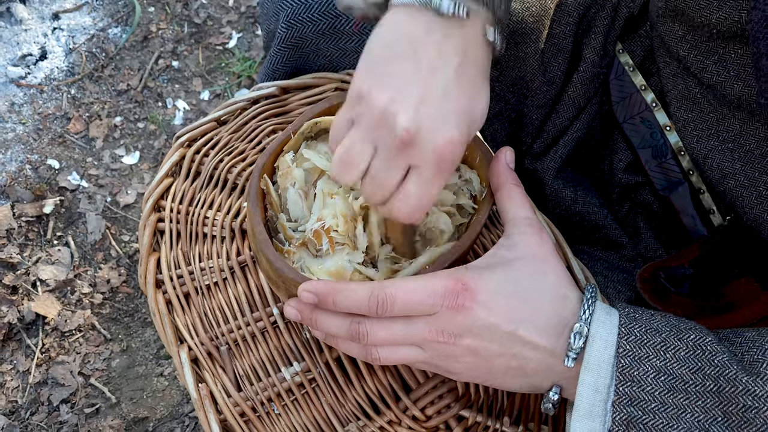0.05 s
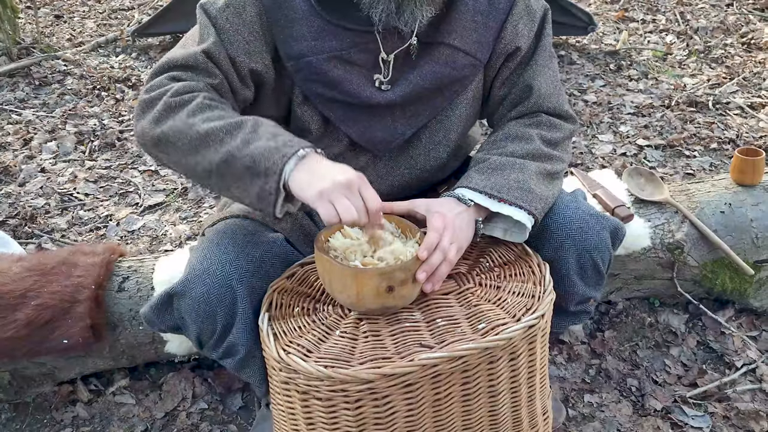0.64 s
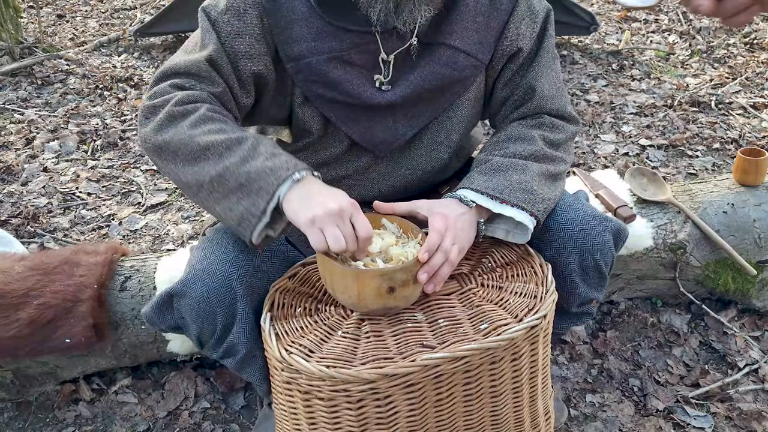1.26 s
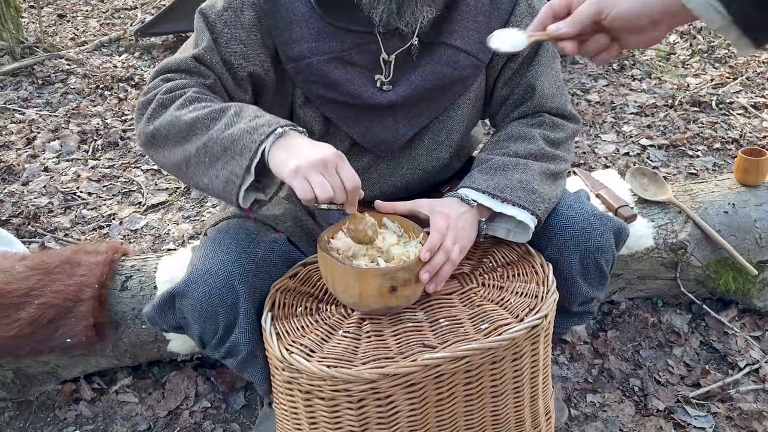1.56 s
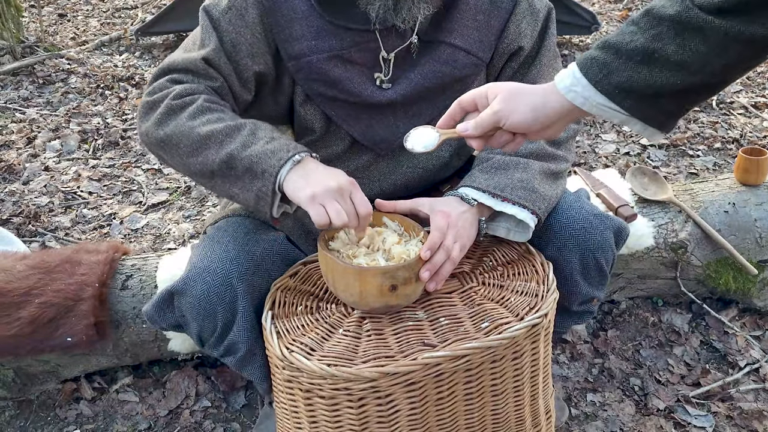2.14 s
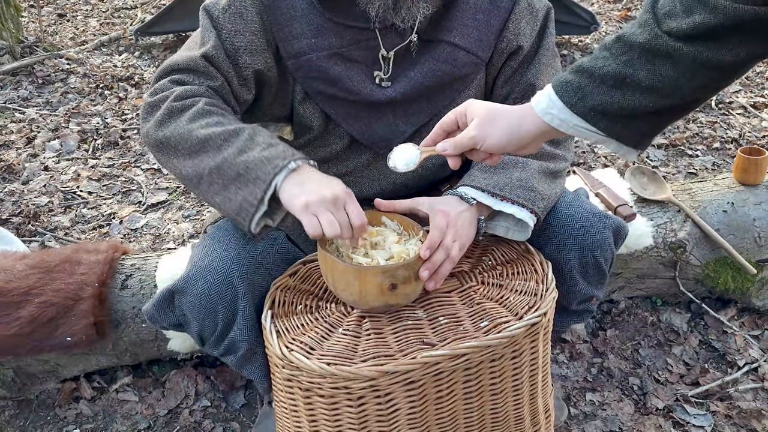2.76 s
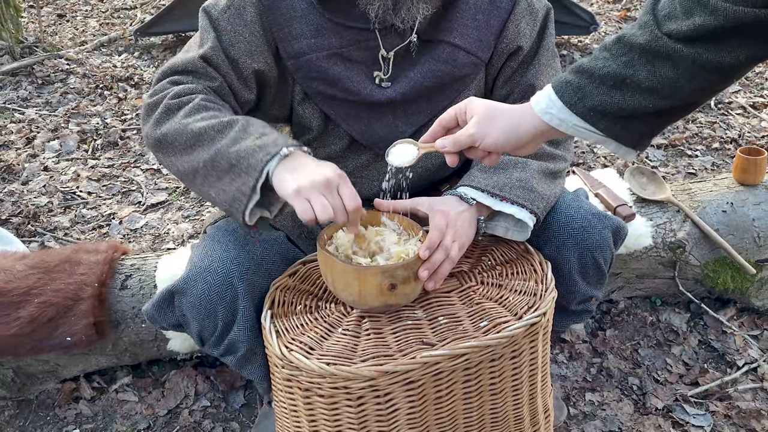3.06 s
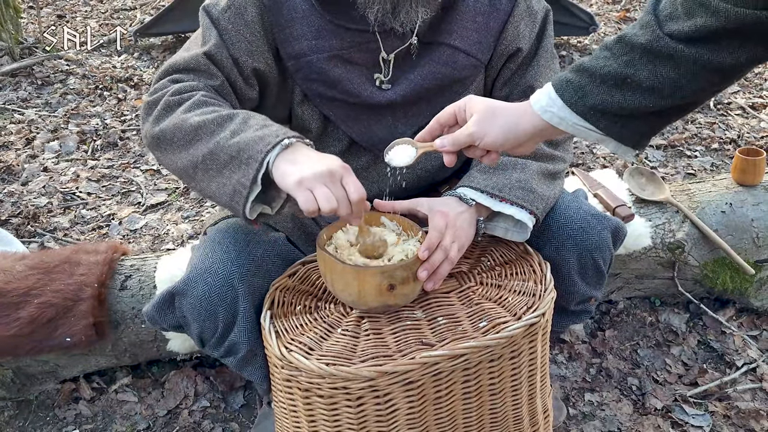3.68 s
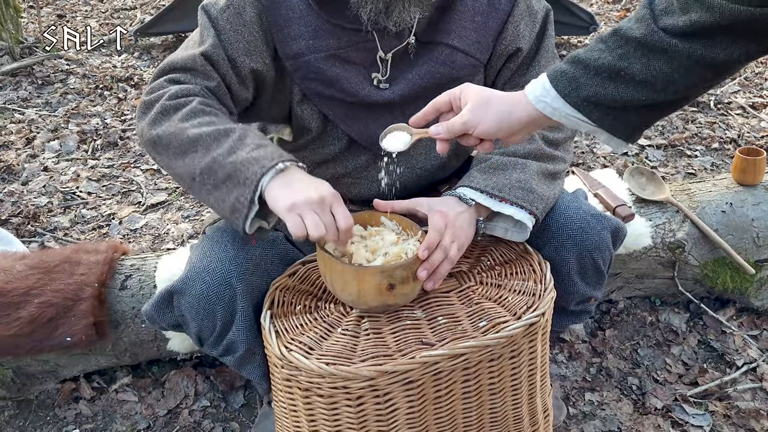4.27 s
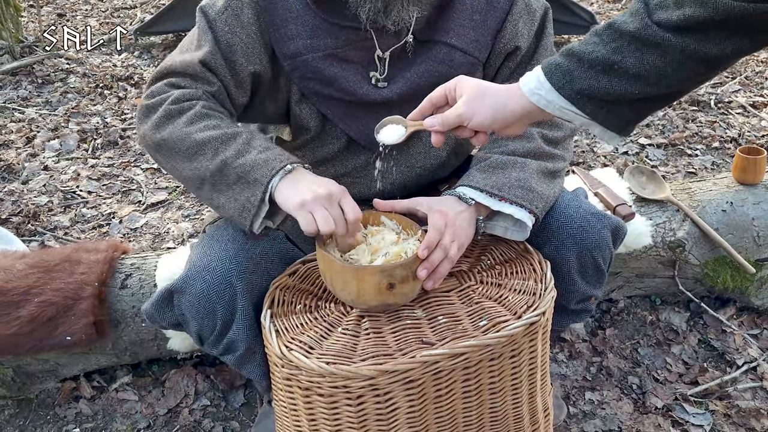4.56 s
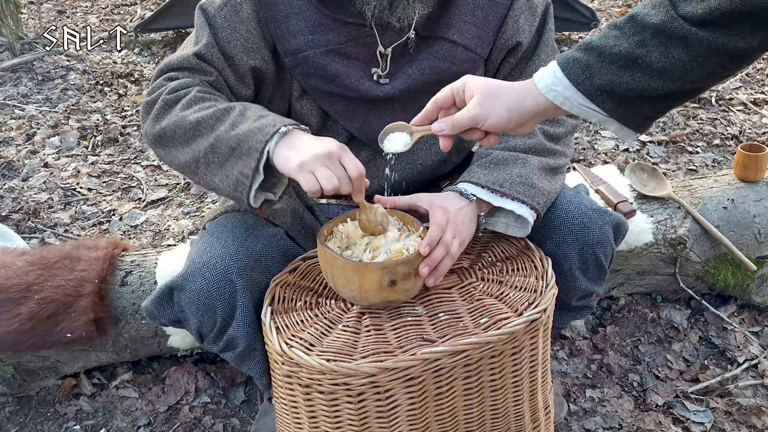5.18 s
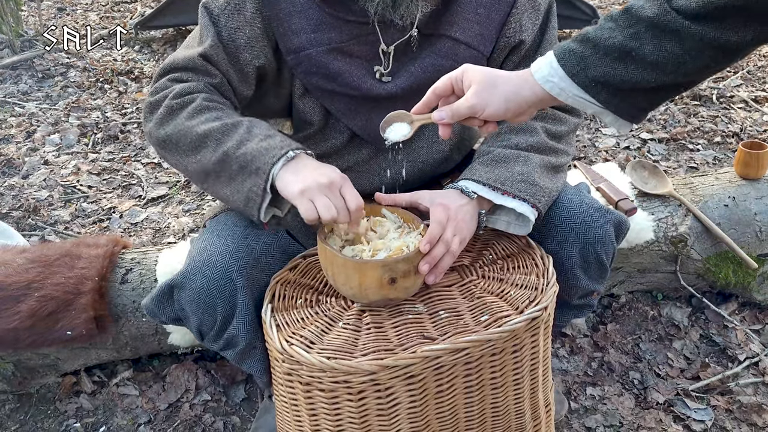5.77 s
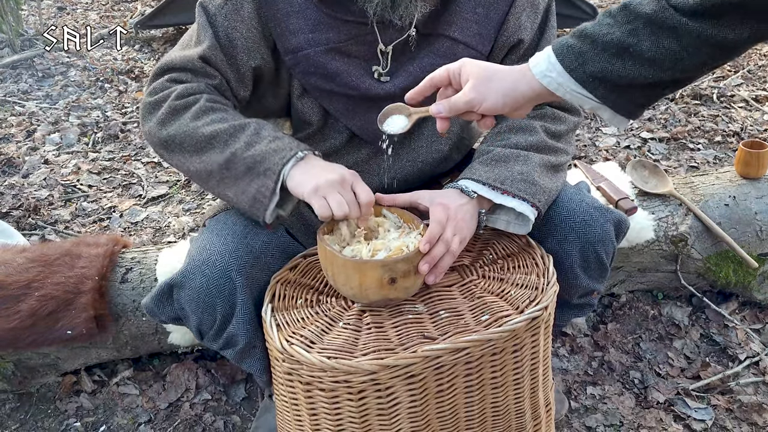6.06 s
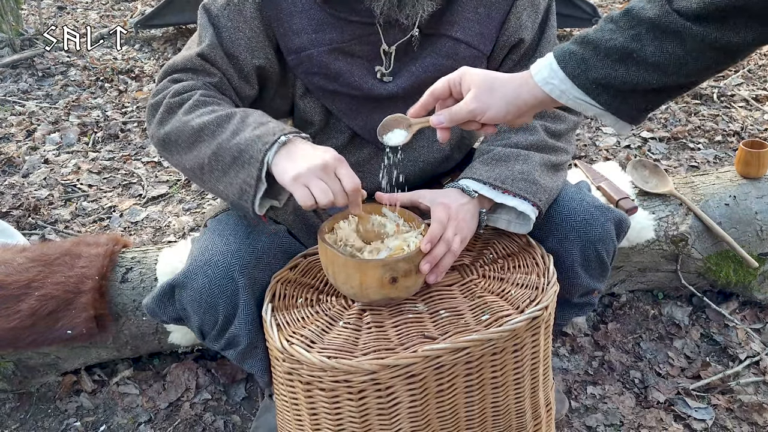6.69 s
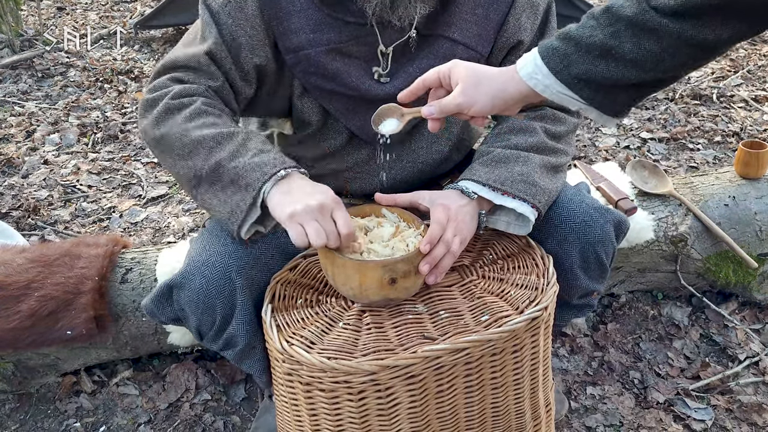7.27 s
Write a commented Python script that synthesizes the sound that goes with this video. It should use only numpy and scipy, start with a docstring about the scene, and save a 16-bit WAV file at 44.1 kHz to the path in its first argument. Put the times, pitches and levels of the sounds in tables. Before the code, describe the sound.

Forest songbirds whistle and twitter around the close cracks, knocks and dry rustle of dried fish being crushed in a wooden bowl.

```python
"""Dried fish is crushed and stirred in a wooden bowl, in a forest full of songbirds.
From the start, flakes snap, knock on the bowl and rustle; near birds whistle, slur and buzz over a
far chorus, and one flutes a phrase. Near 1.5 s the dragging spoon makes the wood groan, then a tiny
bird flicks and twitters. From 2.6 s salt trickles in. After 4 s the snaps are softer, and at 6.7 s
a harsh trill begins."""
import sys
import numpy as np
from scipy import signal
from scipy.fft import rfft, irfft, next_fast_len
from scipy.io import wavfile
from scipy.ndimage import uniform_filter1d, map_coordinates

SR = 44100
rng = np.random.default_rng(int(sys.argv[2]) if len(sys.argv) > 2 else 0)


def output_pcm(signal):
    """Save a mono or channel-first signal as 16-bit PCM at the path in sys.argv[1].

    Samples are clipped to [-1, 1] before scaling.
    """
    pcm = np.clip(np.atleast_2d(signal).T, -1, 1) * 32767
    wavfile.write(sys.argv[1], SR, np.round(pcm).astype(np.int16))


N = 323253
TIME = np.arange(N) / SR


def from_db(db):
    """Decibels to gain."""
    return 10 ** (np.asarray(db) / 20)


def rms_one(x):
    """Scale to unit power."""
    return x / np.sqrt(np.mean(x ** 2) + 1e-20)


def in_time(rows):
    """Interpolate a curve table's columns at every sample."""
    s, *columns = np.transpose(rows)
    return [np.interp(TIME, s, c) for c in columns]


def add(out, start_s, sound):
    """Mix a sound in at start_s."""
    at = max(int(start_s * SR), 0)
    part = out[..., at:at + sound.shape[-1]]
    part += sound[..., :part.shape[-1]]


def panned(x, left_db):
    """Constant-power pan."""
    return rms_one(from_db([[left_db / 2], [-left_db / 2]])) * x


def widen(pair, side_db):
    """Two unrelated signals as mid and side of a centred stereo sound."""
    return pair[0] + from_db(side_db) * pair[1] * np.array([[1], [-1]])


def wander(per_s, size):
    """Smooth random curve, spread about one."""
    place = np.arange(size) * per_s / SR
    return map_coordinates(rng.standard_normal(int(place[-1]) + 3), [place], order=2, mode="mirror")


def coloured(x, spectrum):
    """Filter by (Hz, dB) points; unit power."""
    size = next_fast_len(N)
    hz, level_db = np.transpose(spectrum)
    gain = from_db(np.interp(np.log(np.fft.rfftfreq(size, 1 / SR) + 1), np.log(hz), level_db))
    return rms_one(irfft(rfft(x, size) * gain, size)[..., :N])


def resonate(x, modes):
    """Parallel resonances of alternating sign, band-limited; unit power."""
    out = 0
    for k, (hz, width_hz, level_db) in enumerate(modes):
        r = np.exp(-np.pi * width_hz / SR)
        poles = [1, -2 * r * np.cos(2 * np.pi * hz / SR), r * r]
        out = out + (-1) ** k * from_db(level_db) * signal.lfilter([1 - r, 0, r - 1], poles, x)
    edges_hz = [modes[0][0] * .65, min(modes[-1][0] * 1.4, 19000)]
    return rms_one(signal.sosfilt(signal.butter(2, edges_hz, "band", fs=SR, output="sos"), out))


def scatter(x, t60_s, side_db):
    """Dense, decaying echoes from trunks and ground."""
    t = np.arange(int(SR * .8)) / SR
    echoes = rng.standard_normal((2, len(t))) * from_db(-60 * t / t60_s) * (1 - np.exp(-t / .0016))
    echoes = rms_one(widen(echoes, side_db)) / np.sqrt(len(t))
    return signal.fftconvolve(np.atleast_2d(x), echoes, axes=1)[:, :N]


def grains(per_s, size_db):
    """Two streams of random impulses of unequal size."""
    sizes = from_db(size_db * np.minimum(rng.exponential(1, (2, N)), 4.5))
    return (rng.random((2, N)) < per_s / SR) * sizes * rng.choice([-1, 1], (2, N)) + 1e-18


def glide(hz, change_hz):
    """First, middle and last pitch of an even glide through hz."""
    return [hz - change_hz / 2, hz, hz + change_hz / 2]


def gliding_tone(length_s, pitches_hz, spread_hz, half_hoarse_hz=125, waver_hz=10, flutter_db=1.3):
    """A sine through three pitches; random modulation smears it into a buzz."""
    size = max(int(length_s * SR), 64)
    u = np.linspace(0, 1, size)
    hz = np.polyval(np.polyfit([0, .5, 1], pitches_hz, 2), u) + waver_hz * wander(120, size)
    hoarse = spread_hz ** 2 / (spread_hz ** 2 + half_hoarse_hz ** 2)
    smear = rms_one(wander(3.4 * spread_hz, size) + 1j * wander(5.6 * spread_hz, size))
    carrier = np.exp(2j * np.pi * np.cumsum(hz) / SR)
    tone = np.real((np.sqrt(1 - hoarse) + np.sqrt(hoarse) * smear) * carrier)
    swell = np.sin(np.pi / 2 * np.clip(np.minimum(u, 1 - u) / .14, 0, 1)) ** 2
    return rms_one(tone * swell * from_db(flutter_db * wander(90, size)))


def played(notes):
    """Mix gliding tones into one track."""
    track = np.zeros(N)
    for start_s, length_s, pitches_hz, spread_hz, level_db in notes:
        add(track, start_s, from_db(level_db) * gliding_tone(length_s, pitches_hz, spread_hz))
    return track


# Still air. Each row: frequency in Hz, relative density in dB.
AIR_SPECTRUM = [(20, -24), (55, 4.5), (100, -4.5), (200, -10), (400, -8), (1000, -14.5), (4000, -11),
                (16000, -44)]


def forest_air(level_db=-76):
    """A faint rumble swells and sinks over a steady hush."""
    hush = coloured(widen(rng.standard_normal((2, N)), side_db=-7), AIR_SPECTRUM)
    rumble = signal.sosfilt(signal.butter(2, [40, 160], "band", fs=SR, output="sos"), hush)
    swell = from_db(6 * wander(14, N))
    return from_db(level_db) * (hush + .5 * swell * rumble)


def thin_hiss(start_s=.51, level_db=-53, fade_db_per_s=30):
    """A thin, very high hiss starts near 0.5 s and fades."""
    hiss = coloured(rng.standard_normal((2, N)), [(11500, -51), (12300, 20), (16000, 9.5)])
    envelope_db = level_db - fade_db_per_s * abs(TIME - start_s) + 2 * wander(14.4, N)
    return hiss * from_db(envelope_db) * (TIME > start_s)


# Low, middle and high far voices. Each row: lowest pitch in Hz, highest pitch in Hz.
REGISTERS_HZ = [(1550, 2900), (2700, 4200), (4300, 6300)]
# Their loudness curves. Each row: time in seconds, relative level in dB.
LOW_LEVELS = [(0, -63.5), (.3, -50.5), (.8, -64.5), (1.051, -75), (1.5, -60), (1.851, -73), (2.2, -61),
              (2.8, -59), (3.499, -66), (3.799, -59.5), (4.1, -68), (4.55, -67.5), (4.801, -59),
              (5.298, -64), (5.55, -68.5), (5.85, -61.5), (6.3, -68.5), (6.8, -52.5), (7.301, -62)]
MIDDLE_LEVELS = [(0, -61), (.55, -79), (.8, -49.5), (1.3, -63), (1.75, -48), (2.1, -58.5), (3.05, -59),
                 (3.55, -62.5), (3.801, -68), (4.05, -57.5), (4.299, -74.5), (4.801, -74.5), (5.249, -63.5),
                 (5.751, -90.5), (6.1, -68), (6.45, -75.5), (7.3, -61.5)]
HIGH_LEVELS = [(0, -81), (0.551, -74), (.8, -66.5), (1.05, -82), (1.55, -69), (1.802, -57.5),
               (2.299, -73.5), (2.8, -66.5), (3.55, -68), (3.85, -91.5), (5.55, -75.5), (6, -67.5),
               (6.5, -74.5), (6.799, -64), (7.049, -71), (7.3, -64)]


def far_birds(count=460, slope=.24, bend=.18, uneven_db=10, gain_db=.5):
    """Short, hoarse chirps slide, arch or dip in three registers, blurred by echoes."""
    song = np.zeros(N)
    for (low_hz, high_hz), curve in zip(REGISTERS_HZ, [LOW_LEVELS, MIDDLE_LEVELS, HIGH_LEVELS]):
        level_db, = in_time(curve)
        register = np.zeros(N)
        for k, (when, pitch, length, slur, arch, strength) in enumerate(rng.random((count, 6))):
            u = np.linspace(-1, 1, int((.025 + .07 * length) * SR))
            contour = 1 - slope * (slur - .35) * u + bend * (arch - .4) * u * u
            hz = low_hz * (high_hz / low_hz) ** pitch * contour
            chirp = (1 - u * u) * np.sin(2 * np.pi * np.cumsum(hz) / SR)
            add(register, (k + when - 1) / count * N / SR, from_db(uneven_db * strength) * chirp)
        hoarseness = 1 + low_hz / 4000 * wander(.25 * low_hz, N)
        song += from_db(level_db) * rms_one(register * hoarseness)
    return from_db(gain_db) * (.4 * song + .9 * scatter(song, t60_s=.3, side_db=-22))


def trill(start_s=6.72, end_s=7.9, per_s=30, gain_db=-58):
    """One bird rattles off quick, harsh downstrokes."""
    song = np.zeros(N)
    for s in np.arange(start_s, end_s, 1 / per_s):
        onset_s = s + rng.normal(0, .0043)
        add(song, onset_s, gliding_tone(length_s=.04, pitches_hz=(4900, 4500, 3750), spread_hz=150))
    return from_db(gain_db) * (.6 * song + .8 * scatter(song, t60_s=.25, side_db=-30))


# Downward slurs. Each row: start and length in seconds, first pitch in Hz, last/first pitch ratio,
# relative level in dB.
SLUR_NOTES = [(0.157, 0.048, 2920, 0.81, -48), (0.222, 0.042, 3840, 0.73, -52),
              (1.285, 0.042, 1950, 0.76, -41.5), (1.268, 0.097, 3650, 0.81, -50),
              (1.309, 0.097, 1697, .85, -48.5), (2.439, 0.064, 3190, 0.86, -56.5),
              (3.323, 0.082, 2690, 0.81, -59), (4.026, 0.046, 3670, .85, -48),
              (4.753, 0.115, 3554, .86, -50.5), (5.357, 0.048, 3950, 0.76, -46),
              (5.891, 0.14, 1838, .79, -60.5), (6.163, 0.04, 4420, 0.79, -51.5),
              (6.632, 0.047, 3440, 0.89, -58.5), (6.819, 0.039, 2382, 0.83, -39.5),
              (6.954, 0.046, 2324, 0.84, -40.5)]
# Even glides. Each row: start and length in seconds, middle pitch and glide in Hz, relative level in dB.
WHISTLE_NOTES = [(0.464, 0.065, 1978, -45, -49.5), (0.641, 0.051, 1896, 98, -54.5),
                 (0.834, 0.075, 2120, 120, -42.5), (0.981, 0.1, 2634, 51, -50.5),
                 (1.009, 0.046, 3280, 171.5, -46.5), (1.08, 0.049, 3350, 1112, -44),
                 (1.181, 0.06, 1840, 452.5, -55.5), (2.126, 0.066, 3064, 47, -53),
                 (2.272, 0.15, 3500, -350, -53), (2.516, 0.08, 4350, -100, -61.5),
                 (2.625, .07, 4180, -250, -55.5), (2.671, 0.082, 3255, -19.5, -50.5),
                 (2.699, 0.087, 2400, -130, -58.5), (3.173, 0.076, 4370, -80.5, -62.5),
                 (3.27, 0.14, 4480, -220, -59.5), (3.64, 0.15, 2750, -200, -63.5),
                 (4.272, 0.162, 1935, -4, -68), (0.411, 0.099, 1423, 60, -60.5),
                 (3.139, 0.091, 1744, -28, -59), (4.568, 0.075, 2876, -75.5, -54.5),
                 (5.226, 0.18, 1426, 202, -58.5), (5.371, 0.064, 1692, 131, -48.5),
                 (6.516, 0.27, 1688, -99.5, -47), (6.858, 0.053, 1880, -100, -42.5),
                 (7.162, 0.17, 2796, 225, -55.5)]
# Arches, dips and hooks. Each row: start and length in seconds, first, middle and last pitch in Hz,
# relative level in dB.
CURL_NOTES = [(0.759, 0.098, 1890, 1796, 1970, -49.5), (0.785, 0.02, 3280, 4330, 4300, -48),
              (0.826, 0.029, 3390, 4200, 4550, -50), (.88, .017, 3620, 4250, 4600, -50.5),
              (2.09, 0.078, 4150, 3450, 2975, -53.5), (2.627, 0.054, 4100, 3370, 2770, -54.5),
              (2.829, 0.048, 3800, 3570, 3500, -53.5), (2.86, 0.042, 4480, 4230, 4150, -57.5),
              (2.943, 0.096, 3330, 3604, 3600, -55), (3.064, .06, 3950, 4200, 4260, -57.5),
              (3.082, 0.059, 3670, 3160, 3080, -59), (3.391, .16, 3930, 3244, 3146, -54.5),
              (3.569, .016, 7500, 7010, 6930, -65), (3.609, .016, 7550, 7200, 7050, -62.5),
              (3.64, .016, 7800, 7200, 7100, -68), (3.677, 0.015, 7460, 7240, 7550, -62.5),
              (3.588, 0.15, 5800, 6350, 6430, -67), (4.535, 0.042, 5110, 3540, 3020, -54.5),
              (5.138, .04, 4080, 4120, 4270, -61), (5.163, 0.12, 3650, 2920, 3364, -51.5),
              (5.512, 0.15, 1672, 1736, 1394, -50.5)]


def clear_notes(slur_bow=.025, spread_hz=28, nearest_db=-48, blur_hz_per_db=4.2):
    """Slurs, whistles and curls; fainter singers are farther off and more blurred."""
    notes = [(s, length_s, [hz, hz * ((1 + ratio) / 2 - slur_bow), hz * ratio], db)
             for s, length_s, hz, ratio, db in SLUR_NOTES]
    notes += [(s, length_s, glide(hz, glide_hz), db) for s, length_s, hz, glide_hz, db in WHISTLE_NOTES]
    notes += [(s, length_s, pitches_hz, db) for s, length_s, *pitches_hz, db in CURL_NOTES]
    return played([(s, length_s, pitches_hz, spread_hz + blur_hz_per_db * max(nearest_db - db, 0), db)
                   for s, length_s, pitches_hz, db in notes])


# Hoarse calls, and two faint overtones above other notes (6850 Hz at 1.076 s, 9560 Hz at 1.786 s). Each row:
# start and length in seconds, pitch and spread in Hz, level in dB.
BUZZ_NOTES = [(0.888, 0.071, 3694, 131.3, -51), (1.076, 0.17, 6850, 155, -73.5),
              (1.22, 0.02, 4500, 326, -51), (1.355, 0.026, 4650, 336, -53.5),
              (1.435, 0.073, 2946, 301, -50.5), (1.617, 0.083, 2336, 297.7, -44.5),
              (1.717, 0.23, 2835, 199, -50), (1.786, 0.14, 9560, 59.6, -73),
              (2.125, 0.13, 1673, 169.5, -63), (2.415, 0.14, 1756, 129.3, -60),
              (2.879, 0.21, 2190, 98.9, -58), (3.985, 0.068, 3550, 174.4, -58),
              (4.074, 0.065, 2960, 149, -58), (4.448, 0.16, 1384, 89.8, -63.5),
              (4.948, .07, 2596, 169.5, -64), (5.09, 0.13, 2100, 77, -60), (5.778, 0.092, 1806, 208.4, -54),
              (5.944, 0.21, 4210, 87, -68), (6.469, 0.03, 2560, 125, -53), (6.47, 0.2, 1310, 81.7, -65),
              (6.566, 0.056, 2090, 166, -55.5), (6.717, 0.73, 4620, 109.6, -57),
              (7.051, 0.08, 4030, 212, -53.5), (7.288, 0.025, 5520, 368, -52)]


def buzzes(sag=.025):
    """An unsteady syrinx smears each slightly sinking note."""
    return played([(s, length_s, glide(hz, -sag * hz), spread_hz, db)
                   for s, length_s, hz, spread_hz, db in BUZZ_NOTES])


# One fluted phrase. Each row: time in seconds, pitch in Hz, level in dB.
FLUTED_CURVE = [(.16, 1820, -53.5), (.24, 2115, -48.5), (.3, 1880, -59), (.345, 1696, -46),
                (.39, 2107, -39.5), (.43, 2370, -33), (.455, 2520, -78), (.485, 2690, -40),
                (.53, 2710, -47), (.565, 2757, -43), (.6, 2733, -46), (.635, 2502, -38), (.7, 2468, -58)]


def fluted_phrase(ease_s=.012):
    """A pure tone winds up and down; the throat rounds every turn."""
    hz, level_db = in_time(FLUTED_CURVE)
    size = int(ease_s * SR)
    singing = (TIME > FLUTED_CURVE[0][0]) & (TIME < FLUTED_CURVE[-1][0])
    swell = uniform_filter1d(from_db(level_db) * singing, size)
    return swell * np.sqrt(2) * np.sin(2 * np.pi * np.cumsum(uniform_filter1d(hz, size)) / SR)


# Loud rolls. Each row: start and length in seconds, pitch and sweep in Hz, sweeps per second,
# relative level in dB.
ROLL_NOTES = [(0.726, 0.12, 2460, 260, 68, -42), (0.839, 0.058, 2174, 110, 70, -41.5),
              (1.223, 0.057, 2082, 160, 79, -42), (1.443, 0.038, 2128, 150, 64, -44),
              (1.526, 0.037, 2195, 150, 71, -43), (5.91, 0.087, 1980, 150, 57, -45.5),
              (6.126, 0.057, 2510, 100, 49.5, -43), (6.166, 0.19, 2284, 176, 49, -39),
              (7.256, 0.069, 2234, 60, 81, -36)]


def rolled_notes(ramp_s=.011, uneven=.55, rasp_hz=85):
    """Rasping notes: the pitch sweeps quickly and unevenly about a fixed centre."""
    track = np.zeros(N)
    for start_s, length_s, centre_hz, sweep_hz, per_s, level_db in ROLL_NOTES:
        t = np.arange(int(length_s * SR)) / SR
        turns = np.cumsum(per_s * (1 + uneven * wander(60, len(t)))) / SR
        hz = centre_hz + sweep_hz * np.sin(2 * np.pi * turns) + rasp_hz * wander(600, len(t))
        swell = np.clip(np.minimum(t, length_s - t) / ramp_s, 0, 1)
        add(track, start_s, from_db(level_db) * rms_one(swell * np.sin(2 * np.pi * np.cumsum(hz) / SR)))
    return track


def near_birds():
    """Singers straight ahead: nearby branches roughen the notes and the forest trails them."""
    clear, fluted, rolled, hoarse = clear_notes(), fluted_phrase(), rolled_notes(), buzzes()
    close_echo = from_db(-3.5) * scatter(clear + rolled, t60_s=.07, side_db=-38)
    send = from_db(-6) * clear + from_db(-8) * (fluted + rolled) + from_db(-2) * hoarse
    forest_echo = scatter(send, t60_s=.3, side_db=-40)
    return from_db(-1.35) * (clear + rolled + close_echo) + fluted + hoarse + forest_echo


def twitter(first_break_s=2.086, every_s=.0155, width_s=.0028, depth_db=-19, count=5):
    """The tiny bird's closing note sinks and is chopped by short breaks."""
    breaks = sum(np.exp(-((TIME - first_break_s - k * every_s) / width_s) ** 2) for k in range(count))
    note = gliding_tone(length_s=.2, pitches_hz=(7350, 6800, 6600), spread_hz=65)
    track = np.zeros(N)
    add(track, start_s=2.03, sound=from_db(-41) * note)
    return track * from_db(depth_db * breaks)


# Whip-like flicks. Each row: start and length in seconds, first and last pitch in Hz, level in dB.
FLICK_NOTES = [(1.78, 0.009, 7430, 3700, -42.5), (1.834, 0.009, 7500, 3680, -42),
               (1.892, 0.009, 7650, 3630, -46), (2.008, 0.016, 3690, 6500, -45.5),
               (2.023, 0.018, 3870, 7100, -43)]
# Thin notes between them. Each row: start and length in seconds, first pitch in Hz, level in dB.
HIGH_NOTES = [(1.723, 0.037, 7130, -54.5), (1.748, 0.032, 7000, -45.5), (1.793, 0.029, 6830, -42.5),
              (1.845, 0.031, 6780, -42.5), (1.905, 0.022, 6740, -44.5)]


def tiny_bird(repeat_s=.0075, sink_hz_per_s=4400, rasp_hz=170, thin_rasp_hz=65):
    """Thin, sinking notes alternate with double flicks and end in a twitter."""
    notes = [(s + delay_s, length_s, [first_hz, np.sqrt(first_hz * last_hz), last_hz], rasp_hz, db)
             for s, length_s, first_hz, last_hz, db in FLICK_NOTES for delay_s in (0, repeat_s)]
    for s, length_s, hz, db in HIGH_NOTES:
        pitches_hz = hz - sink_hz_per_s * length_s * np.array([0, .5, 1])
        notes.append((s, length_s, pitches_hz, thin_rasp_hz, db))
        notes.append((s, length_s, .76 * pitches_hz, rasp_hz, db - 14))   # other side of the syrinx
    song = played(notes) + twitter()
    return song + from_db(-8) * scatter(song, t60_s=.31, side_db=-31.5)


def basket(level_db=-83, t60_s=.032, per_mode_per_s=3, scuff_s=.05):
    """The wicker basket under the bowl gives with soft, low scuffs."""
    ringing = 0
    for hz in np.geomspace(50, 270, 8):
        r, w = from_db(-60 / (t60_s * SR)), 2 * np.pi * hz / SR
        kicks = (rng.random(N) < per_mode_per_s / SR) * rng.uniform(.61, 1.7, N) + 1e-18
        ringing = ringing + signal.lfilter([np.sin(w)], [1, -2 * r * np.cos(w), r * r], kicks)
    size = int(scuff_s * SR)
    scuffs = signal.fftconvolve(ringing, np.hanning(size) * rng.standard_normal(size))[:N]
    return from_db(level_db) * rms_one(signal.sosfilt(signal.butter(2, 450, fs=SR, output="sos"), scuffs))


# Bowl against basket. Each row: peak time in seconds, pitch in Hz, level in dB.
BOWL_BUMPS = [(0.102, 176, -49), (0.362, 206, -70), (.96, 54.6, -61.5), (0.999, 245, -75.5),
              (1.52, 130, -70.5), (2.091, 246, -71), (2.301, 61.4, -69.5), (2.32, 170.4, -68.5),
              (2.619, 55, -63.5), (2.8, 93, -62), (2.919, 67, -63), (3.029, 128, -69.5), (3.461, 60.5, -67),
              (3.851, 69.5, -69.5), (4.05, 250, -80), (5.78, 54.9, -63), (4.73, 282, -78), (4.91, 274, -67),
              (6.022, 232, -71), (6.67, 251, -70.5), (6.962, 60, -62)]


def bumps(rise_s=.025, fade_s=.048, edge_ratio=1.3):
    """The bowl bumps its basket: dull bands of noise swell and fade."""
    out, t = np.zeros((2, N)), np.arange(-.2, .2, 1 / SR)
    swell = np.exp(-(t / np.where(t < 0, rise_s, fade_s)) ** 2 / 2)
    for s, hz, level_db in BOWL_BUMPS:
        band = signal.butter(2, [hz / edge_ratio, hz * edge_ratio], "band", fs=SR, output="sos")
        rumble = rms_one(signal.sosfilt(band, widen(rng.standard_normal((2, len(t))), side_db=-15.5)))
        add(out, s + t[0], (from_db(level_db) * rumble * swell)[:, s + t >= 0])
    return out


# Salt on flakes. Each row: frequency in Hz, relative density in dB.
SALT_SPECTRUM = [(3000, -30), (6000, 4), (8500, -5), (11000, 0), (16000, 1.5)]


def salt(start_s=2.63, rise_s=.096, level_db=-77.5):
    """Grains trickle from a spoon and patter on the flakes as a fine hiss."""
    patter = coloured(widen(grains(per_s=2500, size_db=-3.5), side_db=-11.5), SALT_SPECTRUM)
    return patter * from_db(level_db + 3.8 * wander(8.9, N)) * np.clip((TIME - start_s) / rise_s, 0, 1)


# Spoon drags. Each row: start and length in seconds, first pitch, last pitch and spread in Hz,
# relative level in dB.
SPOON_GROANS = [(0.097, 0.015, 218, 200, 35, -67), (0.286, 0.12, 465, 425, 50, -70.5),
                (0.462, 0.042, 1000, 810, 90, -53), (0.877, 0.072, 610, 510, 80, -54),
                (1.291, 0.14, 670, 615, 50, -56), (1.41, 0.13, 560, 420, 90.7, -63.5),
                (1.511, 0.0695, 450, 383.5, 79.8, -43.5), (1.565, 0.116, 270, 231, 44.8, -44),
                (2.321, 0.11, 680, 600, 89.3, -65.5), (3.761, .04, 427, 380, 91, -58.5),
                (4.181, 0.11, 730, 670, 70, -65), (4.901, 0.078, 460, 400, 89, -66),
                (6.359, 0.078, 410, 350, 60, -64)]


def groans():
    """The spoon sticks and slips on the wood; the rough tone sinks as it slows."""
    return played([(s, length_s, [first_hz, np.sqrt(first_hz * last_hz), last_hz], spread_hz, db)
                   for s, length_s, first_hz, last_hz, spread_hz, db in SPOON_GROANS])


# Strokes through the flakes. Each row: start and hold in seconds, relative rub and rustle levels in dB.
STIR_STROKES = [(0.075, 0.0046, -39.5, -67.5), (0.288, 0.0089, -47.5, -71), (0.46, 0.061, -65, -71),
                (0.893, 0.017, -44, -74.5), (1.305, 0.27, -53, -97), (1.555, 0.14, -31.5, -67.5),
                (1.636, 0.04, -47, -57), (2.312, 0.0066, -46.5, -63.5), (2.474, 0.067, -58.5, -82.5),
                (2.813, 0.047, -59.5, -75), (3.096, 0.073, -76, -74), (3.478, 0.059, -75.5, -79.5),
                (3.771, 0.03, -44, -64), (3.915, 0.015, -59, -72.5), (4.196, 0.0054, -44, -64),
                (4.529, 0.057, -70, -77.5), (4.915, 0.012, -45, -63.5), (5.321, 0.04, -65, -69.5),
                (5.403, 0.036, -71, -66.5), (5.66, 0.076, -58, -77), (6.06, 0.07, -73, -76),
                (6.115, 0.085, -50.5, -68), (6.455, 0.0073, -64.5, -59.5), (6.557, 0.04, -82.5, -70.5),
                (6.77, 0.011, -88, -76), (6.888, 0.023, -69, -72), (7.251, 0.014, -55, -76)]


def stroke_levels(bite_db_per_s=476.5, ease_db_per_s=239.5):
    """Rub and rustle curves in dB: each stroke bites, holds and eases off."""
    rub_db, rustle_db = -77, -90.5   # flakes keep settling between strokes
    for s, hold_s, held_rub_db, held_rustle_db in STIR_STROKES:
        ramps_db = np.minimum(bite_db_per_s * (TIME - s), ease_db_per_s * (s + hold_s - TIME))
        shape_db = np.minimum(ramps_db, 0)
        rub_db = np.maximum(rub_db, held_rub_db + shape_db)
        rustle_db = np.maximum(rustle_db, held_rustle_db + shape_db)
    return rub_db, rustle_db


# Low bowl resonances. Each row: frequency and width in Hz, relative gain in dB.
THUD_MODES = [(156, 33, -8), (243, 49, -3), (410, 76, -3), (520, 76, 0.5), (612, 200, 5), (780, 360, 4.5),
              (1050, 40, -10)]
# Rustling flakes. Each row: frequency in Hz, relative density in dB.
RUSTLE_SPECTRUM = [(900, -1.5), (2000, 7), (4500, 4), (7000, 6), (8500, 4.5), (10000, 1.5), (13000, 4.5),
                   (16000, -8)]


def stirring():
    """Flakes drag over the wood, which hums, and crackle against each other in clumps."""
    rub_db, rustle_db = stroke_levels()
    drags = widen(grains(per_s=2600, size_db=2.6), side_db=-5)
    rubbing = from_db(rub_db - 12) * resonate(drags, THUD_MODES) + from_db(-1.5) * groans()
    crackle = grains(per_s=3600, size_db=4.5) * from_db(1.8 * wander(70, N))
    rustle = panned(coloured(crackle, RUSTLE_SPECTRUM), left_db=1.5)
    return rubbing + from_db(rustle_db + 15.5) * rustle


def crumbs():
    """Single crumbs break off with dry ticks, louder under each stroke."""
    _, rustle_db = stroke_levels()
    ticks = coloured(widen(grains(per_s=24, size_db=0), side_db=-7.5), RUSTLE_SPECTRUM)
    return from_db(rustle_db - 1) * panned(ticks, left_db=8)


# Resonances of the bowl (knock), stiff flakes (crack) and their fibres (splinter).
# Each row: frequency and width in Hz, relative gain in dB.
KNOCK_MODES = [(1650, 70, -8.5), (2160, 1500, -0.5), (2780, 250, 4)]
CRACK_MODES = [(4240, 670, 1.5), (5700, 480, 2.5), (7600, 1500, 2.5), (8350, 1700, -4)]
SPLINTER_MODES = [(9600, 750, -1), (13160, 5700, -1.5), (15400, 1200, 1.3)]
# Breaking flakes. Each row: time in seconds, thud, crack and splinter levels in dB over 10 ms,
# flake's left-over-right level in dB, right channel lag in ms.
FLAKE_SNAPS = [(.0865, -26, -40, -60, 4, .07), (.2738, -46, -28, -31, 5, .35),
               (.2792, -40, -26, -27, 7, .35), (.3593, -58, -36, -44, 8, .32),
               (.5518, -55, -36, -23, 8, .33), (1.6915, -31.5, -46, -49, 0, 0),
               (2.3072, -44, -26, -27, 7, .07), (2.3088, -40, -27, -21.5, 8, .09),
               (2.816, -68, -47, -64, 10, .25), (3.12, -75, -50, -53, 6, .28),
               (3.147, -78, -54, -59, 6, .28), (3.7625, -39, -25, -27, 4, .28),
               (3.917, -66, -51, -47, 8, .28), (4.1853, -48, -50, -42, 9, .28),
               (4.8945, -43, -46, -42, 8, .35), (4.935, -64, -53, -54, 6, .3), (5.056, -76, -63, -68, 3, 0),
               (5.332, -64, -54, -59, 2, 0), (5.3924, -66, -48, -49, 2, 0), (5.408, -76, -55, -53, 2, 0),
               (5.448, -76, -55, -55, 2, 0), (5.5002, -57, -76, -76, 2, 0), (5.293, -78, -62, -63, 2, 0),
               (5.635, -84, -66, -64, 2, 0), (5.816, -82, -56, -68, 7, 0), (5.829, -84, -63, -62, 3, 0),
               (6.111, -76, -60, -58, 3, 0), (6.128, -50, -49, -48, 5, .28), (6.192, -68, -56, -52, 2, 0),
               (6.4475, -72, -50, -49, 3, .03), (6.5576, -71, -52, -44, 2, 0), (6.582, -78, -60, -57, 2, 0),
               (6.603, -74, -55, -56, 2, 0), (6.7515, -84, -53, -47, 7, .1), (7.143, -80, -70, -64, 3, 0),
               (7.242, -72, -64, -61, 2, 0)]


def snaps(lead_in_s=.0019, break_s=.0009, crumble_s=.0034, tail_s=.028, knock_db=1.5):
    """A flake breaks within a millisecond and crumbles, shaking bowl and fibres."""
    out, t = np.zeros((2, N)), np.arange(-.004, .15, 1 / SR)
    lead_in = from_db(-10) * np.exp(-abs(t) / lead_in_s)   # faint noise swells just before each snap
    crumble = from_db(-11) * np.exp(-abs(t) / crumble_s)
    tail = from_db(-30) * np.exp(-abs(t) / tail_s)
    envelope = np.where(t < 0, lead_in, np.exp(-abs(t) / break_s) + crumble + tail)
    per_10_ms = np.sqrt(.01 * SR / len(t))
    for s, thud_db, crack_db, splinter_db, left_db, lag_ms in FLAKE_SNAPS:
        burst = rng.standard_normal((2, len(t))) * envelope
        burst[0, np.argmax(envelope)] += 4   # the first clean break
        narrow, wide = widen(burst, side_db=-11), widen(burst, side_db=-2)
        thud = from_db(thud_db) * resonate(narrow, THUD_MODES)
        knock = from_db(thud_db + knock_db) * resonate(narrow, KNOCK_MODES)
        crack = from_db(crack_db) * resonate(wide, CRACK_MODES)
        splinter = from_db(splinter_db) * resonate(wide, SPLINTER_MODES)
        left, right = per_10_ms * (panned(thud + knock, left_db / 4) + panned(crack + splinter, left_db))
        add(out[0], s + t[0], left)
        add(out[1], s + t[0] + lag_ms / 1000, right)
    return out + from_db(-41) * scatter(out, t60_s=.21, side_db=-18)


def scene():
    """The bowl close by, a thin hiss, birds and forest behind."""
    bowl = snaps() + stirring() + crumbs() + salt() + basket() + bumps()
    return bowl + thin_hiss() + near_birds() + tiny_bird() + trill() + far_birds() + forest_air()


def record(dry):
    """Steep low-pass at 16.6 kHz."""
    return signal.sosfilt(signal.ellip(10, .2, 80, 16600, fs=SR, output="sos"), dry)


dry = scene()
out = record(dry)
output_pcm(out)
```